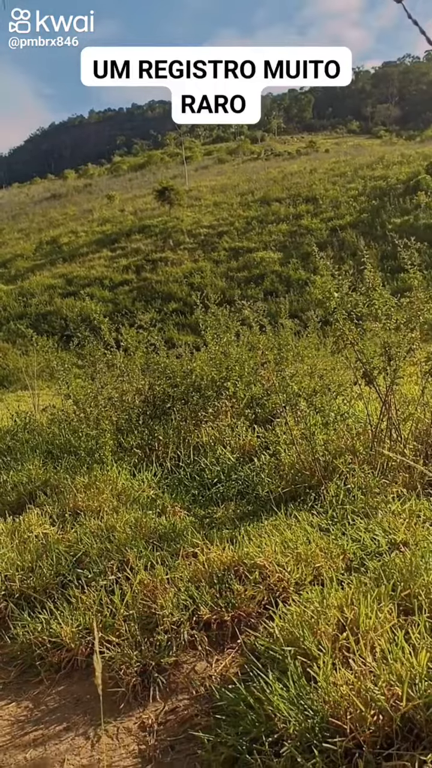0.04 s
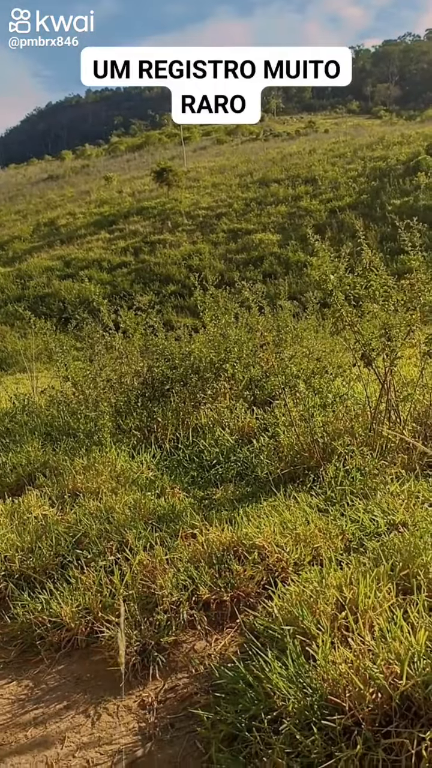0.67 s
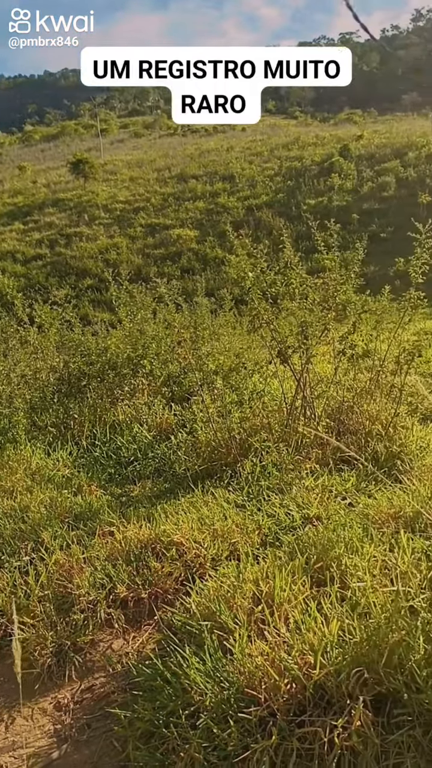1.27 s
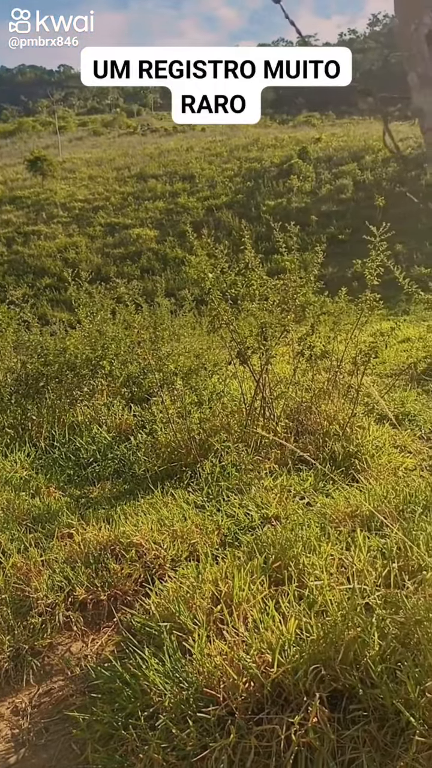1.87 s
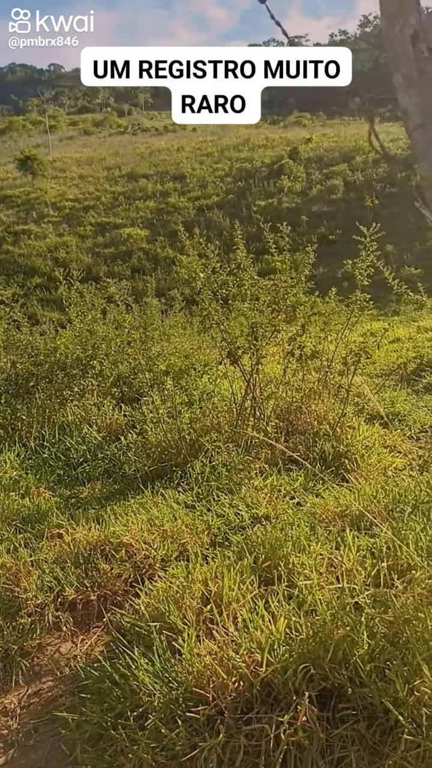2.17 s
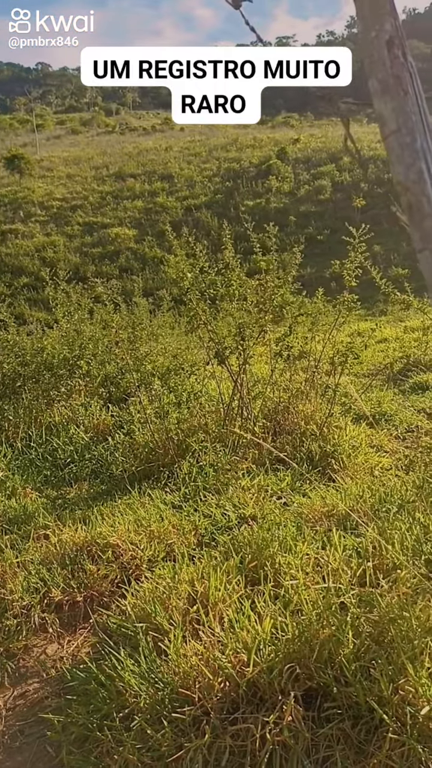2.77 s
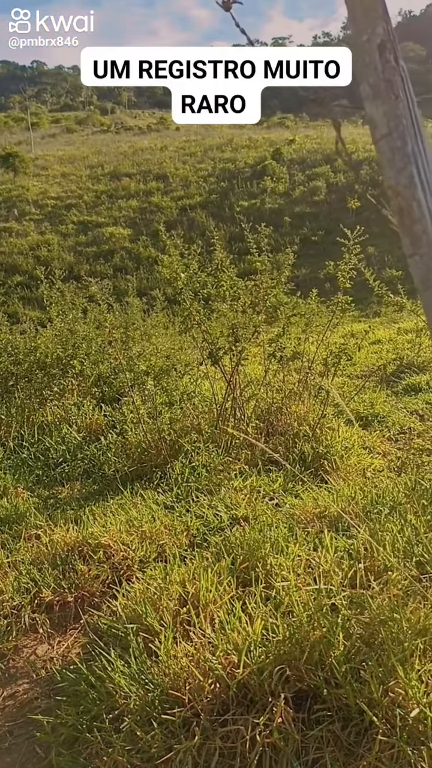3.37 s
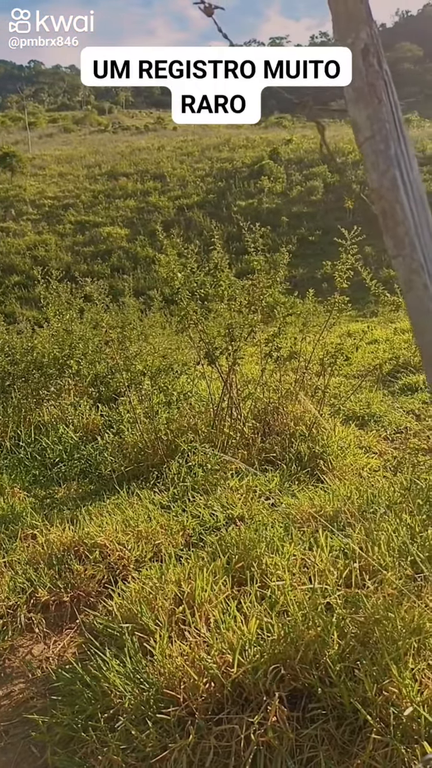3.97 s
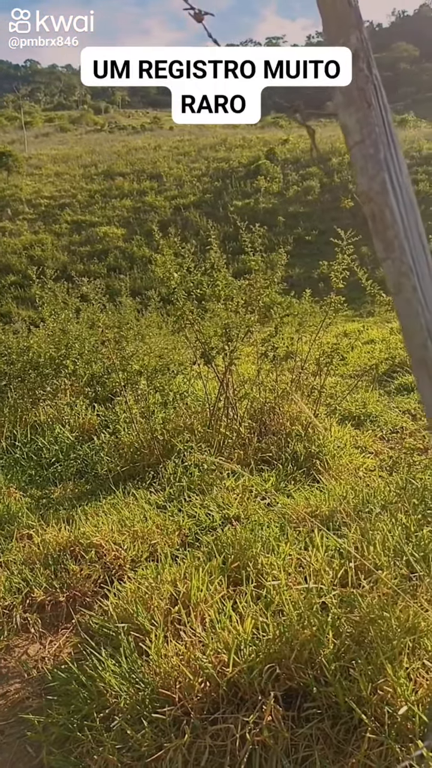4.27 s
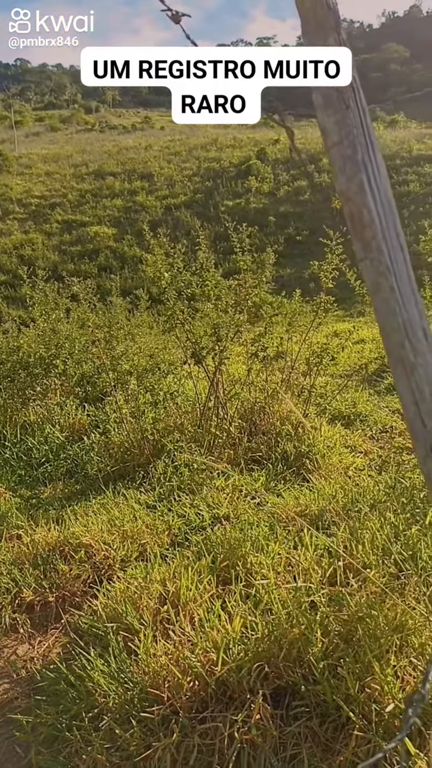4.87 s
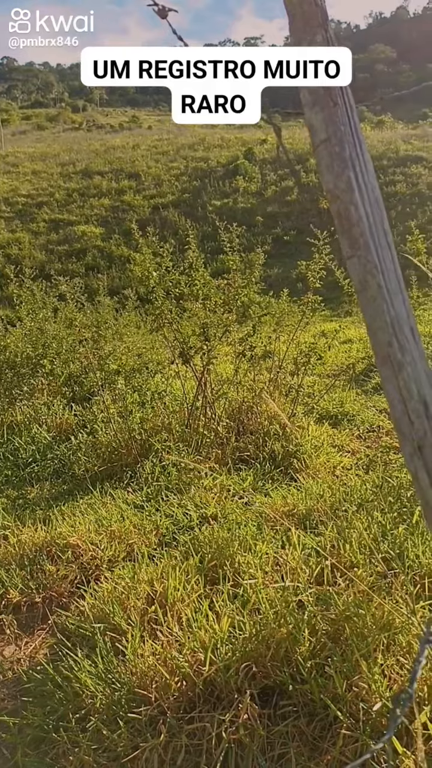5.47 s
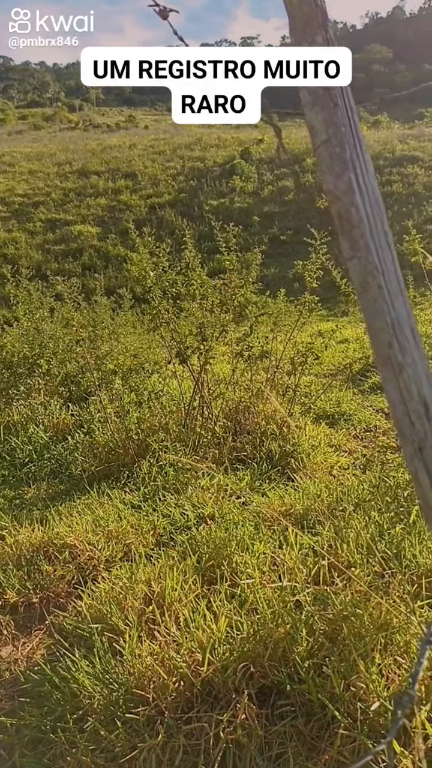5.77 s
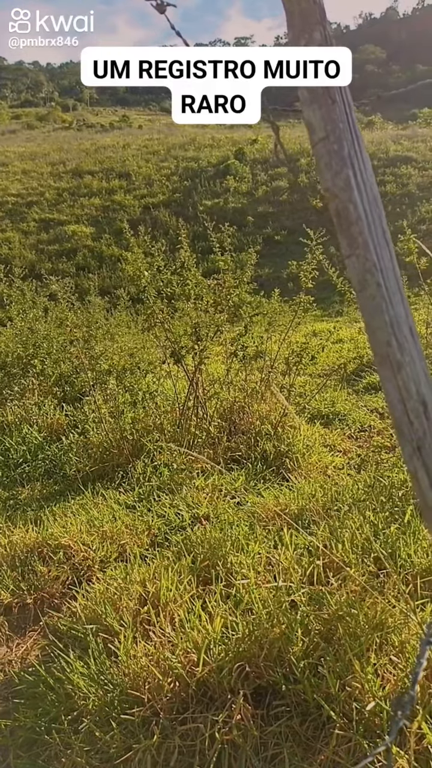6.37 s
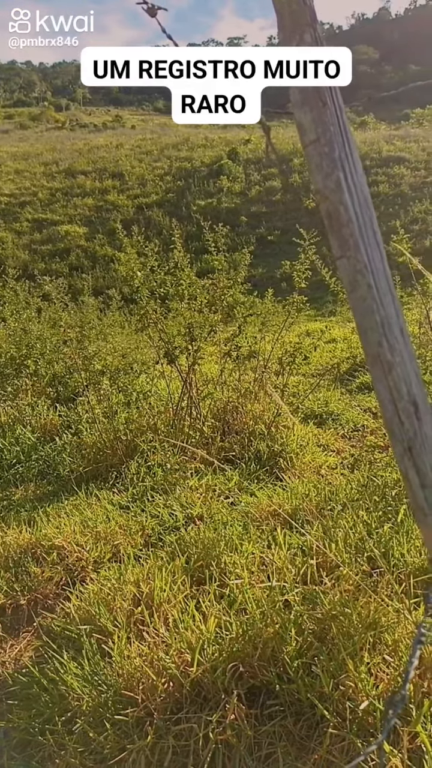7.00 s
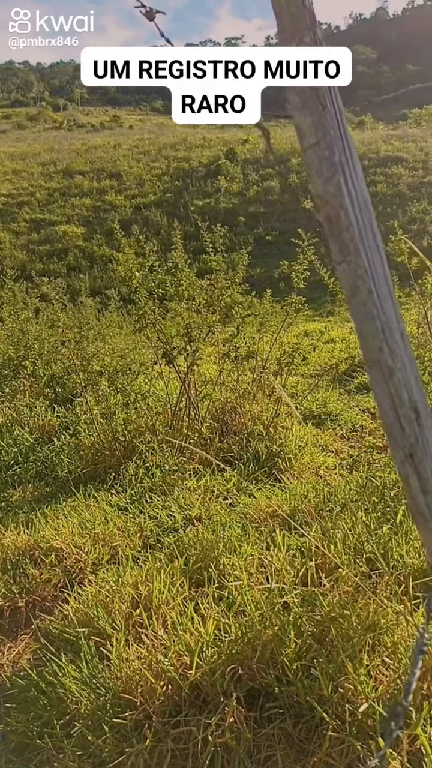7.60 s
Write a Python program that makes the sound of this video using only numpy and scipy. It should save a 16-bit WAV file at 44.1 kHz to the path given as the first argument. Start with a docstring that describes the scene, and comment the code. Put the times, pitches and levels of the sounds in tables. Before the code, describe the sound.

In an open pasture, a bird whistles short clear notes that speed up, then sink in pitch into a fading trill, with a soft hillside echo. Wind buffets the microphone at first and dies down. A distant songbird warbles twice among faint rasps, and a few dry stalks tick. Near the end come a brief rattling call and another bird's quiet nasal yelps.

```python
"""A tinamou hidden in a pasture whistles notes that speed up, then sink into a trill; a hillside
sends them back. Farther from the stereo microphone a songbird warbles twice among soft rasps.
Near the end come two thin pips, a rattling call of ringing pulses and another bird's nasal yelps.
Wind buffets the microphone's ports and dies down; a few dry stalks tick over the field's quiet hiss."""
import sys
import numpy as np
from scipy import signal
from scipy.fft import rfft, irfft, next_fast_len
from scipy.io import wavfile
from scipy.ndimage import uniform_filter1d, map_coordinates

SR = 44100
rng = np.random.default_rng(int(sys.argv[2]) if len(sys.argv) > 2 else 0)


def to_wav(sig):
    """Store sig (one row per channel, or 1-D mono) as 16-bit WAV at the path in sys.argv[1].

    Samples outside -1..1 are clipped; the rate is SR.
    """
    pcm = np.clip(np.atleast_2d(sig), -1, 1) * 32767
    pcm = np.round(pcm).astype(np.int16)
    wavfile.write(sys.argv[1], SR, pcm.T)  # frames by channels


N = 336924

# the breeze dying away between gusts: time_s, level_db
BREEZE_LEVEL = [(0, -29.5), (.3, -48.5), (.55, -53), (.8, -42.5), (1.1, -50), (1.5, -56), (1.95, -55.5),
                (2.15, -60.5), (2.4, -56), (2.65, -74), (2.85, -62), (3.4, -65.5), (3.7, -75), (7.64, -74)]
# gusts striking the microphone: start_s, length_s, level_db, extra_flutter_db
MIC_GUSTS = [(0, 0.056, -46, 12), (0.161, 0.038, -30, 0.5), (0.172, 0.052, -39, 16),
             (0.311, 0.055, -39, 12), (0.39, 0.075, -29.5, -0.5), (.455, 0.043, -29, -0.5),
             (0.585, 0.024, -33, -1), (0.635, 0.033, -39, -10), (0.694, 0.036, -42, 8.5),
             (.748, 0.044, -32.5, -1.5), (.79, 0.11, -51, 8), (0.909, 0.029, -31, -2.5),
             (0.923, 0.044, -38.5, 7), (1.053, .06, -48.5, 9), (1.206, 0.03, -37, -1.5),
             (1.35, 0.018, -42.5, -19), (1.757, 0.027, -51, 9), (1.868, 0.029, -42.5, -5),
             (2.024, 0.021, -48.5, 2.5), (2.24, 0.028, -44.5, -4), (2.32, 0.042, -48, -15),
             (2.81, .075, -57.5, -16), (2.995, 0.06, -56, -4), (3.296, 0.17, -66.5, -13),
             (3.952, 0.043, -61, -2), (4.898, 0.032, -62.5, -6), (4.967, 0.084, -53, -12),
             (5.92, 0.05, -56, -10), (5.975, 0.12, -50, -8), (6.095, 0.055, -56, -10),
             (6.276, 0.045, -57.5, -9), (6.337, .03, -59, 0), (6.465, 0.091, -60.5, -9)]
# the wind's low buffet and its brighter flutter: freq_hz, density_db
BUFFET_SPECTRUM = [(25, -36), (40, -25.5), (60, -7.5), (90, 6.5), (130, 2.5), (180, -7), (260, -35),
                   (500, -59)]
FLUTTER_SPECTRUM = [(80, -50), (140, -5.5), (190, 3), (260, -0.5), (350, -10), (450, -20), (650, -31.5),
                    (2000, -40)]
# the wind veering from port to port: time_s, left_over_right_db
WIND_BALANCE = [(0, 4.5), (2.1, 11), (2.6, 4), (5.8, 0), (6, -18), (6.6, -7)]
# hiss of the open field: freq_hz, density_db
HISS_SPECTRUM = [(25, -27), (40, -15), (62, -5), (100, -9), (250, -3.5), (500, -8), (1000, -10), (1700, -9),
                 (2600, -11), (4000, -17.5), (6300, -19), (9000, -26), (12500, -23), (15600, -28.5)]
# which side the hiss leans to: freq_hz, left_over_right_db
HISS_BALANCE = [(100, -3), (500, 0), (1500, -4.5), (3000, -4.5), (5000, -3), (8000, -1.5), (12000, 8.5)]
# how alike the hiss is at the two ports: freq_hz, correlation
HISS_LIKENESS = [(100, 0.41), (600, 0.25), (1500, 0.27), (5000, 0.035)]
# the tinamou's notes: start_s, lowest_pitch_hz, level_db
TINAMOU_NOTES = [(.248, 1982, -41), (0.991, 1999, -42), (1.637, 2033, -42), (2.121, 2085, -39.5),
                 (2.575, 2169, -41.5), (2.954, 2215, -40.5), (3.316, 2188, -41), (3.663, 2215, -42.5),
                 (3.999, 2130, -43.5), (4.298, 2097, -42.5), (4.592, 2023, -42.5), (4.875, 1975, -41),
                 (5.135, 1934, -42), (5.271, 1905, -48), (5.351, 1844, -44.5), (5.437, 1834, -47),
                 (5.516, 1814, -44.5), (5.601, 1783, -44.5), (5.68, 1788, -45), (5.761, 1775, -46),
                 (5.837, 1740, -47), (5.913, 1698, -50), (5.994, 1715, -49.5), (6.066, 1638, -53),
                 (6.144, 1620, -54), (6.232, 1628, -55)]
# loudness through one note: share_of_note, gain_db
NOTE_SWELL = [(0, -6.5), (.1, -3.5), (.35, 2), (.6, -2), (.85, -5.5), (1, -10.5)]
# how far a note's ends lie above its lowest pitch: time_s, opening_share, closing_share
NOTE_BEND = [(.25, .11, 0.1), (1.6, 0.12, 0.09), (2.6, 0.12, 0.036), (4.25, 0.2, 0.04),
             (5.15, 0.037, 0.0034), (5.7, 0.03, 0.041), (6.1, 0.11, 0.081)]
# what the tinamou's throat lets out of its overtones: freq_hz, gain_db
THROAT_RESPONSE = [(3500, -37), (4000, -35), (4230, -43), (4450, -34), (4750, -34.5), (5300, -44),
                   (5950, -37.5), (6350, -32.5), (6700, -36.5), (7300, -42)]
# the whistle plus its ground bounce at the ports: freq_hz, left_db, right_db, left_lead_rad
PORT_RESPONSE = [(1670, 1.5, 6.5, 2.84), (1840, -15, -1.5, 1.93), (2011, -4, 5, 1.52),
                 (2075, -1.5, -2, 2.7), (2258, -8.5, -5, 3.6), (2254, -4, 6.5, 3.6), (2617, -4.5, 1, 8.8),
                 (4770, 1, 4, 11.5), (5100, 1, 6, 43), (6840, -2, 6.5, 6.9), (7540, -18, 1, 22)]
# answer of near bushes, then the hillside: delay_s, relative_db
ECHO_ENVELOPE = [(0, -46), (.008, -2), (.03, -7), (.05, -9.5), (.08, -15), (.12, -30.5), (.19, -26),
                 (.21, -16), (.245, -18.5), (.27, -36.5), (.4, -29), (.8, -45)]
# strength of that answer to the tinamou: freq_hz, gain_db
ECHO_RESPONSE = [(1700, -8), (2000, -7), (2250, -3), (4400, -3), (6400, -4.5)]
# distant rasps: start_s, length_s, level_db
FAR_RASPS = [(0.656, 0.09, -68), (1.373, 0.12, -69.5), (3.22, .07, -69.5), (3.612, 0.094, -69),
             (4.228, 0.073, -70.5), (4.813, 0.078, -70)]
# their hoarse colour: freq_hz, density_db
RASP_SPECTRUM = [(2000, -33), (2900, -9), (3500, 0), (4300, -13), (5250, -5), (6200, -14), (8000, -35)]
# the songbird's two phrases: start_s, level_db
PHRASES = [(1.104, -69.5), (4.655, -72.5)]
# slurs of a phrase: offset_s, length_s, opening_hz, middle_hz, closing_hz, stress_db
PHRASE_SLURS = [(.005, .09, 3000, 3700, 2640, -7.5), (0.132, 0.0556, 3450, 3570, 3740, -10),
                (0.36, 0.076, 4050, 3560, 3290, -2.5), (.43, .08, 3750, 2830, 2280, 0),
                (0.614, .105, 4580, 2880, 3440, -2), (.788, .065, 4850, 3400, 4200, -2),
                (.86, 0.082, 4380, 4050, 2370, -5), (0.933, .06, 2450, 2670, 3000, -3)]
# knocks and ticks of dry stalks: start_s, level_db, centre_hz, t60_s
STALK_TICKS = [(1.762, -61, 5400, 0.014), (2.802, -54.5, 650, 0.019), (3.212, -45, 470, 0.015),
               (3.461, -66, 5500, 0.026), (4.396, -52, 680, 0.0095), (5.655, -61.5, 696, 0.025),
               (6.759, -53, 4530, 0.028)]
# thin contact calls: start_s, length_s, pitch_hz, level_db
CONTACT_PIPS = [(6.027, 0.038, 6470, -67), (6.485, 0.021, 5920, -62)]
# course of the rattling call: time_s, main_modes_db, low_mode_db
RATTLE_LEVELS = [(6.775, -64, -58), (6.81, -66, -62.5), (6.83, -56.5, -61), (6.87, -57, -64),
                 (6.93, -57.5, -68.5), (7.0, -59.5, -70), (7.05, -60.5, -74), (7.1, -73, -66),
                 (7.135, -69, -83)]
# its main and low resonances: centre_hz, width_hz, gain_db
RATTLE_MAIN_MODES = [(1516, 48, -3.5), (1930, 91, -12)]
RATTLE_LOW_MODE = [(1290, 116, 0)]
# the last bird's yelps: start_s, length_s, top_pitch_hz, level_db
YELP_NOTES = [(6.862, 0.059, 1544, -76), (6.999, 0.06, 1688, -68), (7.139, 0.056, 1740, -65),
              (7.272, 0.065, 1790, -61.5), (7.413, 0.063, 1798, -61.5), (7.551, 0.067, 1796, -61)]
# their nasal tone: harmonic_number, gain_db
YELP_HARMONICS = [(1, -9.5), (2, 0.5), (3, -2), (4, -21), (5, -25), (6, -28), (7, -21.5)]


def amp(db):
    """Decibels to gain."""
    return 10 ** (np.asarray(db) / 20)


def unit(x):
    """Scale to rms 1."""
    return x / np.sqrt(np.mean(x ** 2) + 1e-20)


def along(points, hz):
    """Read (freq_hz, value) points on a log frequency axis."""
    freqs, values = np.transpose(points)
    return np.interp(np.log(hz + 1), np.log(freqs + 1), values)


def curves(rows, at=np.arange(N) / SR):
    """Read each later column along the first, by default at every sample's time."""
    axis, *columns = np.transpose(rows)
    return [np.interp(at, axis, column) for column in columns]


def wobble(rate_hz, size=N):
    """A smooth random curve with rate_hz knots a second."""
    knots = rng.standard_normal(int(size * rate_hz / SR) + 4)
    return map_coordinates(knots, [np.arange(size) * rate_hz / SR])


def filtered(x, response):
    """Pass x through a complex response of frequency."""
    size = next_fast_len(x.shape[-1] + SR // 4)
    return irfft(rfft(x, size) * response(np.fft.rfftfreq(size, 1 / SR)), size)[..., :x.shape[-1]]


def add(track, start_s, sound):
    """Mix a sound into the track."""
    part = track[max(round(start_s * SR), 0):][:len(sound)]
    part += sound[:len(part)]


def hump(length_s):
    """A half-sine rise and fall."""
    return np.sin(np.linspace(0, np.pi, int(length_s * SR)))


def eddies(spectrum, steady):
    """Turbulence at each port; steady (0-1) evens out its chance swells."""
    noise = filtered(rng.standard_normal((2, N)), lambda f: amp(along(spectrum, f)))
    power = np.abs(uniform_filter1d(noise ** 2, size=2600, axis=1)) + 1e-20
    return unit(noise / power ** (steady / 2))


def wind(low_cut_hz=62, high_cut_hz=560, lumps_db=3):
    """A lumpy breeze and short gusts buffet the microphone, now more at one port, now the other."""
    breeze = amp(curves(BREEZE_LEVEL)[0] + lumps_db * wobble(30))
    buffet_power, flutter_power = breeze ** 2, breeze ** 2
    for start_s, length_s, db, extra_flutter_db in MIC_GUSTS:
        puff = amp(db) * hump(length_s)
        add(buffet_power, start_s, puff ** 2)
        add(flutter_power, start_s, (amp(extra_flutter_db) * puff) ** 2)
    buffet = np.sqrt(buffet_power)
    # stronger wind flutters brighter
    flutter = np.sqrt(flutter_power) * amp(-11) * (buffet / amp(-40)) ** 0.17
    gusts = buffet * eddies(BUFFET_SPECTRUM, steady=1) + flutter * eddies(FLUTTER_SPECTRUM, steady=.94)
    gusts *= amp(np.outer([.5, -.5], curves(WIND_BALANCE)[0]) - 1.67)
    low_cut = lambda f: f ** 3 / np.sqrt(f ** 6 + low_cut_hz ** 6)
    return filtered(gusts, lambda f: low_cut(f) / np.sqrt(1 + (f / high_cut_hz) ** 6))


def field_hiss(level_db=-68, drift_db=.5):
    """The faint even hiss of the open field, all round the microphone."""
    def mid_and_side(f):
        angle = np.arccos(along(HISS_LIKENESS, f)) / 2
        return amp(along(HISS_SPECTRUM, f)) * [np.cos(angle), np.sin(angle)]
    mid, side = filtered(rng.standard_normal((2, N)), mid_and_side)
    balance = lambda f: amp(np.outer([.5, -.5], along(HISS_BALANCE, f)))
    hiss = filtered(np.array([mid + side, mid - side]), balance)
    return amp(level_db + drift_db * wobble(3)) * unit(hiss)


def whistle(hz, db, harmonics=((1, 0),)):
    """A syrinx tone on a pitch curve, with soft ends."""
    phase = 2 * np.pi * np.cumsum(hz) / SR
    tone = sum(amp(gain_db) * np.sin(k * phase) for k, gain_db in harmonics)
    return np.sqrt(2) * amp(db) * tone * signal.windows.tukey(len(hz), .1)


def tinamou_note(start_s, length_s, lowest_hz, db, dip_at=0.3725, waver=0.007, flick_s=0.0026):
    """One whistle drops onto its lowest pitch and lifts again as it fades."""
    size = int(length_s * SR)
    progress = np.linspace(0, 1, size)
    opening, closing = curves(NOTE_BEND, start_s)
    drop = np.clip(1 - progress / dip_at, 0, 1) ** 1.656
    lift = np.sin(np.pi / 2 * np.clip((progress - dip_at) / (1 - dip_at), 0, 1)) ** 2
    hz = lowest_hz * (1 + opening * drop + closing * lift) * (1 + waver * wobble(166, size))
    # the syrinx starts tense: a quick flick from above opens the note
    hz *= 1 + 0.06 * np.exp(-progress * length_s / flick_s)
    # the overtones come and go more than the fundamental
    overtones = [(k, along(THROAT_RESPONSE, k * hz) + 4 * wobble(84, size)) for k in (2, 3)]
    level_db = db + curves(NOTE_SWELL, progress)[0] + 2.5 * wobble(158.5, size)
    return whistle(hz, level_db, [(0.99, 0)] + overtones)  # the fundamental sits 1% flat


def ground_bounce(f):
    """The direct whistle and its bounce off the ground combine differently at each port."""
    left_db, right_db, lead_rad = curves(PORT_RESPONSE, f)
    return np.array([amp(left_db) * np.exp(1j * lead_rad), amp(right_db)])


def field_echo(x, reach_s=.8):
    """Scatter from near bushes and, if reach_s allows, the hillside; unrelated at the two ports."""
    t = np.arange(int(reach_s * SR)) / SR
    tail = rng.standard_normal((2, len(t))) * amp(curves(ECHO_ENVELOPE, t)[0])
    return signal.fftconvolve(x[None], tail / np.linalg.norm(tail[0]), axes=1)[:, :N]


def tinamou(longest_note_s=0.0804, duty=.52, end_s=6.29):
    """The song crosses the pasture and echoes back; its notes shorten as it hurries."""
    song, echoes = np.zeros(N), np.zeros((2, N))
    gaps_s = np.diff([start_s for start_s, _, _ in TINAMOU_NOTES] + [end_s])
    for (start_s, lowest_hz, db), gap_s in zip(TINAMOU_NOTES, gaps_s):
        note = tinamou_note(start_s, min(longest_note_s, duty * gap_s), lowest_hz, db)
        add(song, start_s, note)
        # the air keeps moving, so every note is scattered anew
        for port, echo in zip(echoes, field_echo(note)):
            add(port, start_s, echo)
    echoes = filtered(echoes, lambda f: amp(along(ECHO_RESPONSE, f)))
    return filtered(song, ground_bounce) + amp([[-5.5], [0]]) * echoes


def rasps(roughness_db=1.7):
    """Soft hoarse rasps from far off in the grass, a little to the right."""
    swell = np.zeros(N)
    for start_s, length_s, db in FAR_RASPS:
        add(swell, start_s, amp(db) * hump(length_s))
    noise = unit(filtered(rng.standard_normal((2, N)), lambda f: amp(along(RASP_SPECTRUM, f))))
    return swell * noise * amp(roughness_db * wobble(180)) * amp([[-3], [1]])


def songbird(waver=0.027, flicker_db=5):
    """Far off to the right a bird slurs the same quick phrase twice; thin pips follow."""
    song, pips = np.zeros(N), np.zeros(N)
    for start_s, db in PHRASES:
        for offset_s, length_s, *pitches_hz, stress_db in PHRASE_SLURS:
            size = int(length_s * SR)
            glide_hz = np.interp(np.linspace(0, 1, size), [0, .5, 1], pitches_hz)
            hz = uniform_filter1d(glide_hz, size=400) * (1 + waver * wobble(303, size))
            add(song, start_s + offset_s, whistle(hz, db + stress_db + flicker_db * wobble(131.5, size)))
    for start_s, length_s, hz, db in CONTACT_PIPS:
        swell = hump(length_s)
        add(pips, start_s, swell * whistle(hz * (1 + 0.012 * wobble(340, len(swell))), db))
    bushes = field_echo(song + amp(-7.5) * pips, reach_s=.12)
    return (song + pips + bushes) * amp([[-5], [0]])


def stalks():
    """Dry stalks tick, dull or bright: a snap of noise passes twice through a broad resonance."""
    ticks, t = np.zeros(N), np.arange(SR // 8) / SR
    for start_s, db, hz, t60_s in STALK_TICKS:
        snap = amp(db + 4.5 - 60 * t / t60_s) * rng.standard_normal(len(t))
        body = lambda f: 2j * f * hz / (hz * hz - f * f + 2j * f * hz)
        add(ticks, start_s, filtered(filtered(snap, body), body) * np.sqrt(4000 / hz))
    return ticks + amp(-4.5) * field_echo(ticks, reach_s=0.082)


def rattle_pulse(modes, attack_s=0.0015, detune=0.029):
    """One pulse swells for a few cycles, then rings out in slightly detuned resonances."""
    t = np.arange(SR // 30) / SR
    ring = np.zeros(len(t))
    for centre_hz, width_hz, db in modes:
        hz = centre_hz * (1 + detune * rng.standard_normal())
        ring += amp(db) * np.sin(2 * np.pi * hz * t) * np.exp(-np.pi * width_hz * t)
    return ring * (1 - np.exp(-t / attack_s))


def rattling_call(squeak_at_s=6.757, pulse_hz=66.2, jitter_s=.0005):
    """On the right, a falling squeak breaks into a dry run of pulses."""
    start_s, end_s = RATTLE_LEVELS[0][0], RATTLE_LEVELS[-1][0]
    onsets_s = np.arange(start_s + 0.00194, end_s, 1 / pulse_hz)
    onsets_s += jitter_s * rng.standard_normal(len(onsets_s))
    call = np.zeros(N)
    for modes, db in zip((RATTLE_MAIN_MODES, RATTLE_LOW_MODE), curves(RATTLE_LEVELS)):
        pulses = np.zeros(N)
        for onset_s in onsets_s:
            add(pulses, onset_s, rattle_pulse(modes))
        call += amp(db) * unit(pulses) * np.sqrt((end_s - start_s) * SR / N)
    swell = hump(0.018)
    squeak_hz = 1850 - 330 * np.linspace(0, 1, len(swell)) ** 2
    add(call, squeak_at_s, swell * whistle(squeak_hz, db=-53))
    return (call + amp(-3) * field_echo(call, reach_s=.06)) * amp([[-3], [2]])


def yelping_bird(arch=.25, jitter=.011):
    """Raspy nasal yelps near centre arch in pitch, stressed just past the crest, and grow louder."""
    yelps = np.zeros(N)
    for start_s, length_s, top_hz, db in YELP_NOTES:
        size = int(length_s * SR)
        from_crest = np.linspace(-1, 1, size)
        hz = top_hz * (1 - arch * np.abs(from_crest) ** 2.7) * (1 + jitter * wobble(900, size))
        harmonics = [(k, gain_db + 2.5 * wobble(300, size)) for k, gain_db in YELP_HARMONICS]
        add(yelps, start_s, whistle(hz, db - 2 - 13 * (from_crest - .15) ** 2, harmonics))
    return (yelps + amp(-6) * field_echo(yelps, reach_s=.1)) * amp([[-1], [1]])


def scene():
    """The pasture from where the microphone stands: birds, stalks, wind and hiss."""
    calls = tinamou() + songbird() + yelping_bird() + rattling_call() + rasps()
    return calls + stalks() + wind() + field_hiss()


def record(dry, band_limit_hz=15700):
    """The recorder keeps nothing above its band limit."""
    return filtered(dry, lambda f: f < band_limit_hz)


dry = scene()
out = record(dry)
to_wav(out)
```